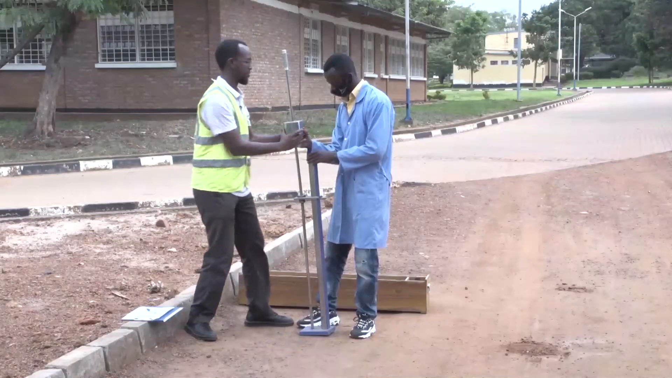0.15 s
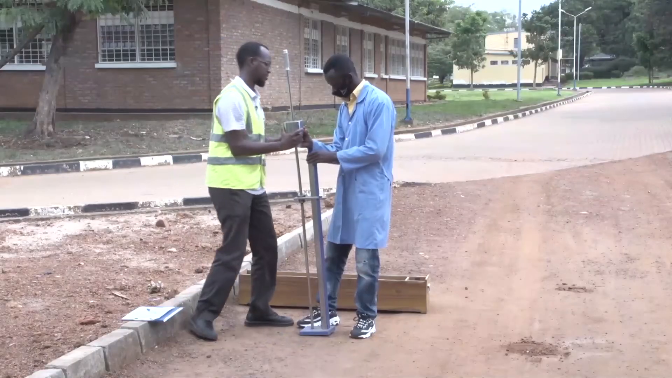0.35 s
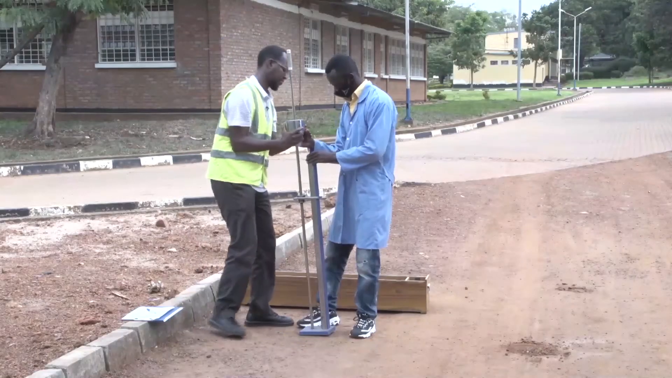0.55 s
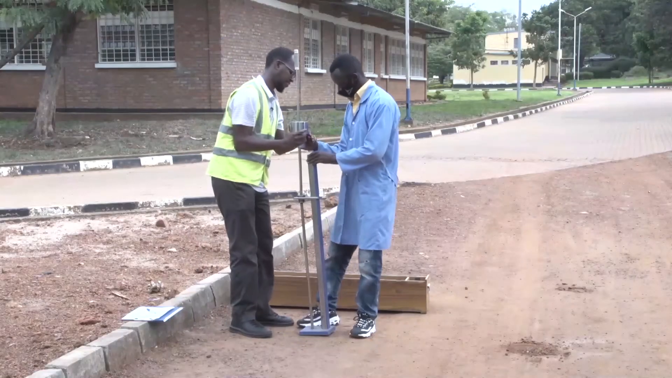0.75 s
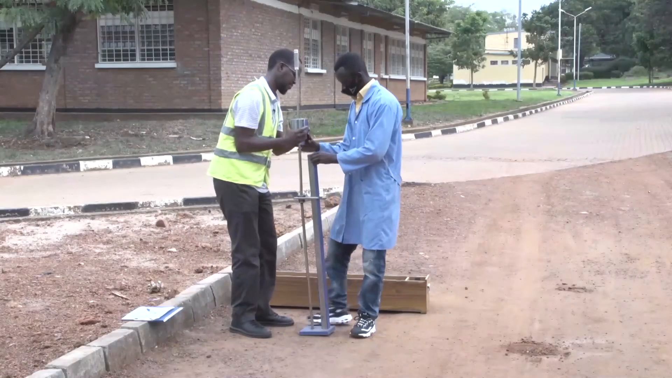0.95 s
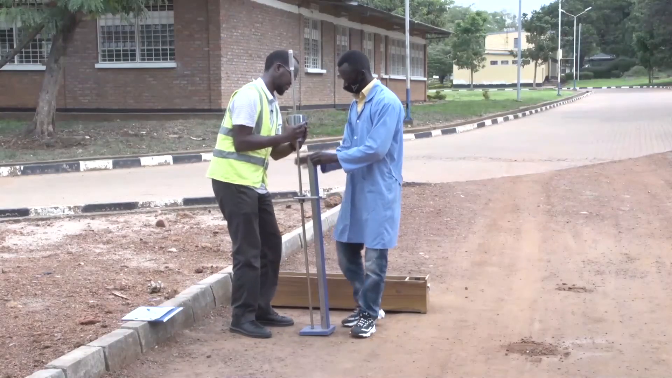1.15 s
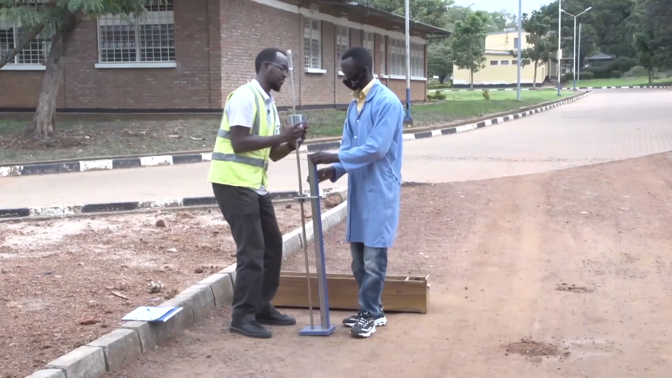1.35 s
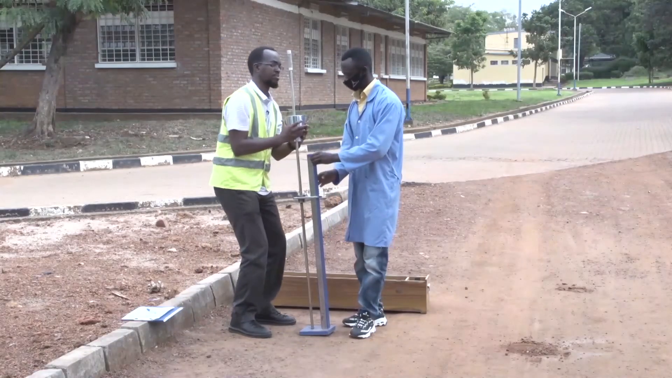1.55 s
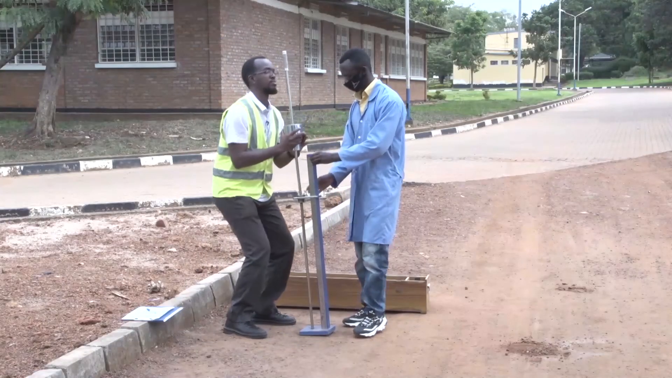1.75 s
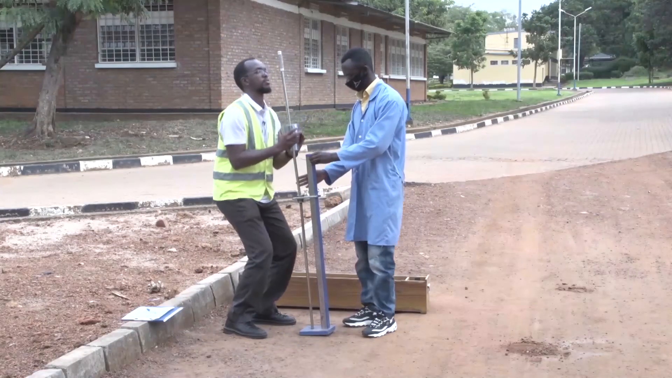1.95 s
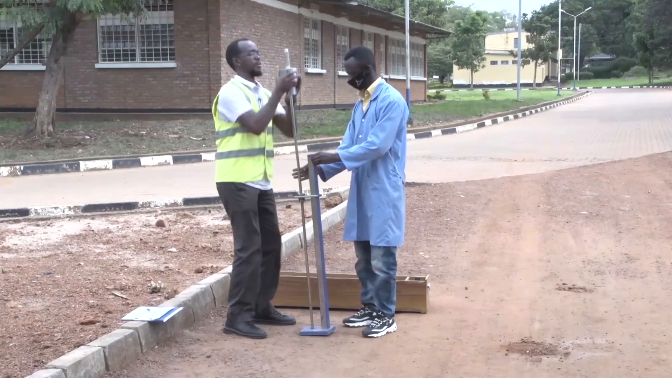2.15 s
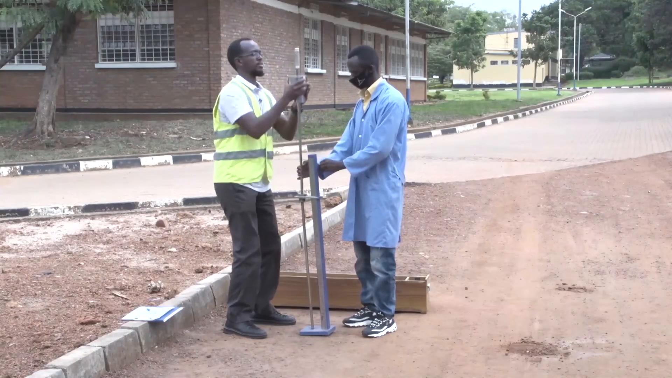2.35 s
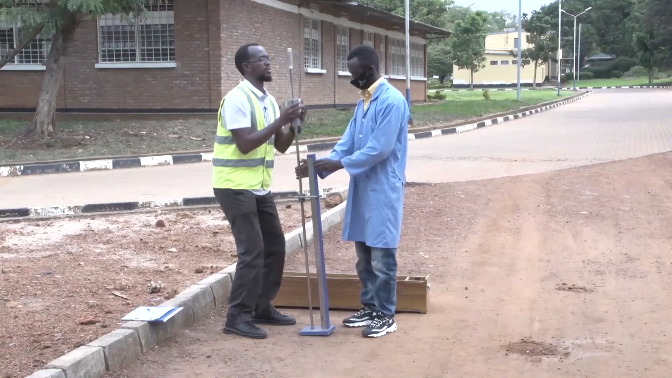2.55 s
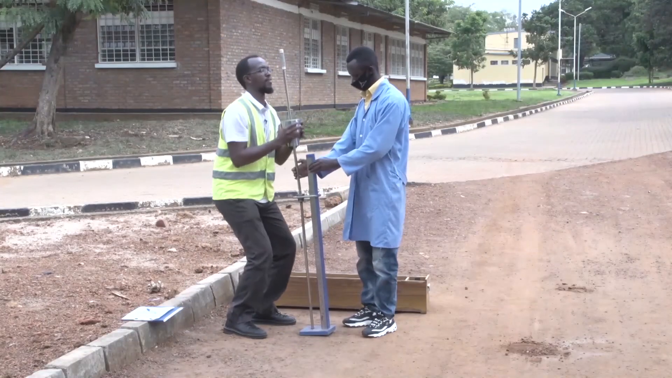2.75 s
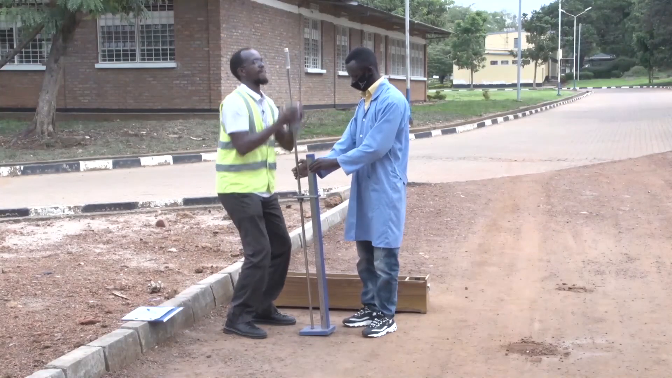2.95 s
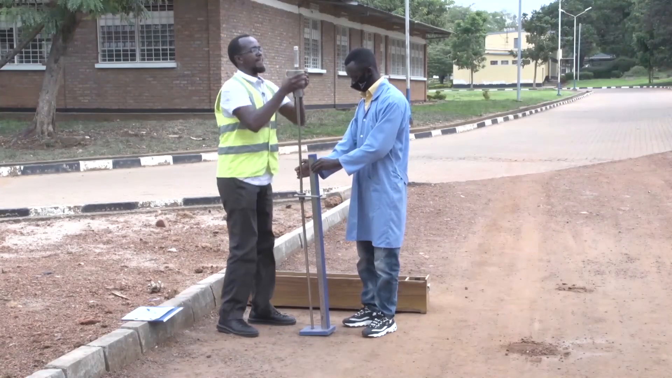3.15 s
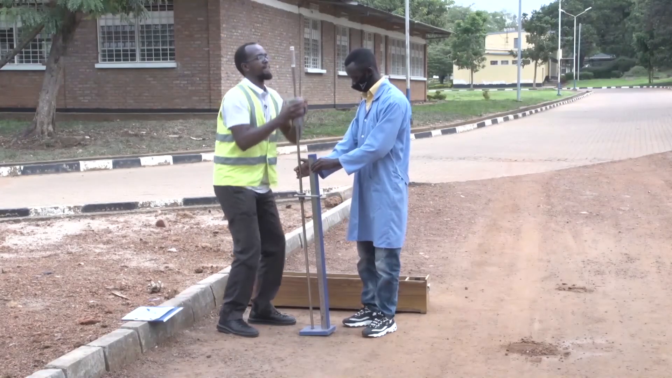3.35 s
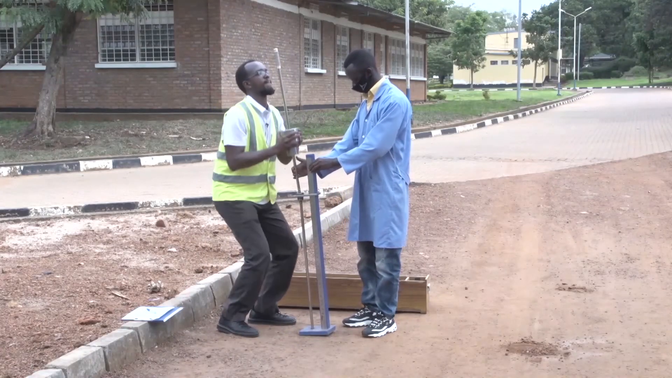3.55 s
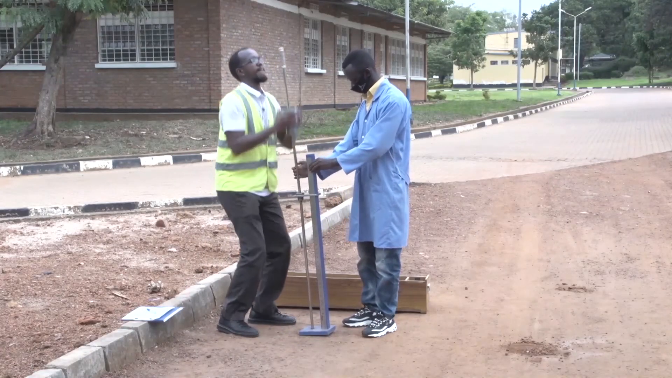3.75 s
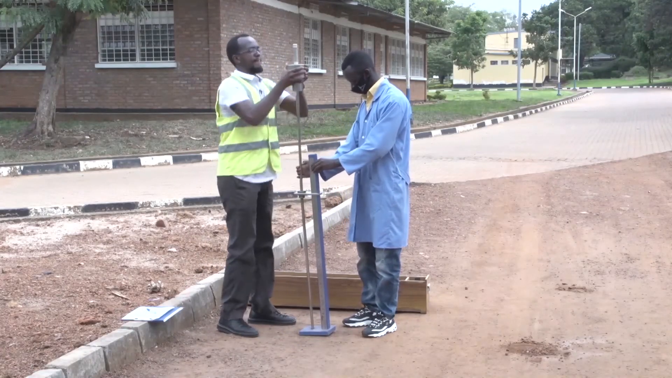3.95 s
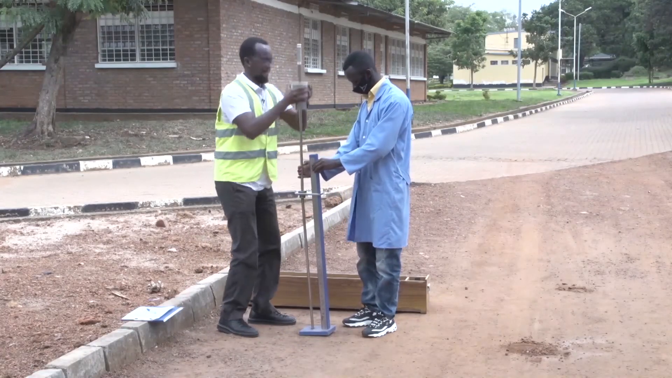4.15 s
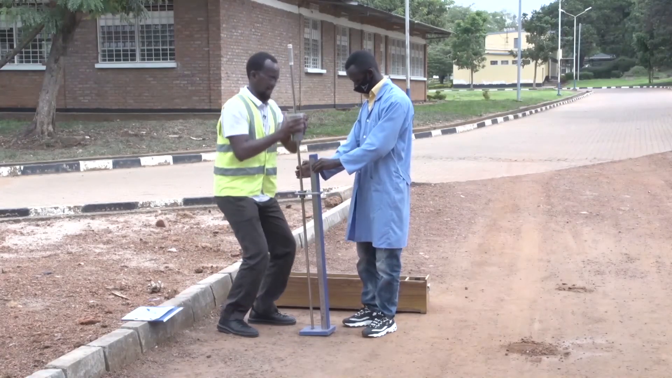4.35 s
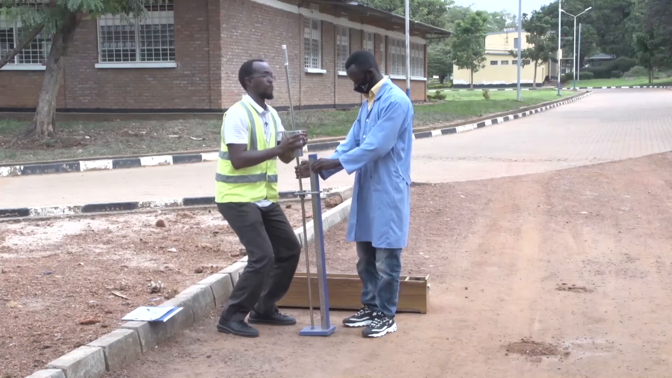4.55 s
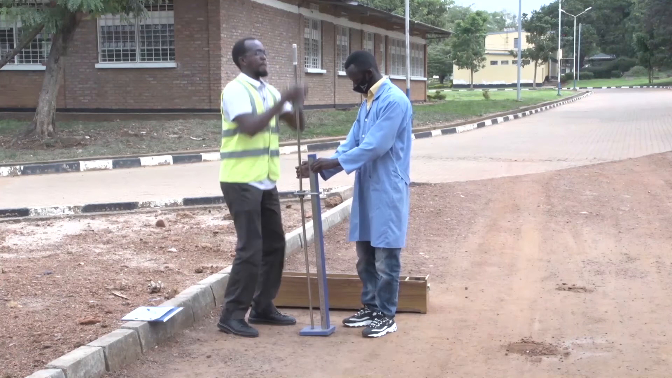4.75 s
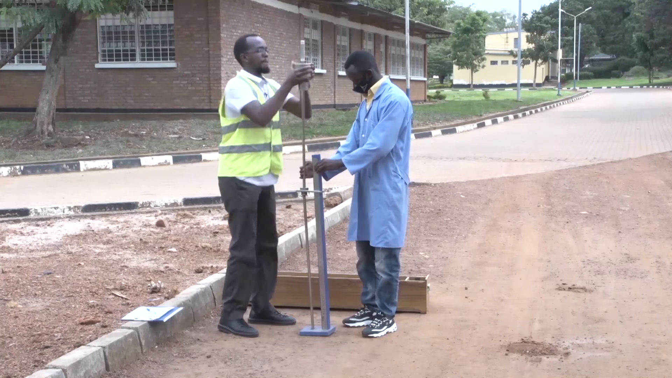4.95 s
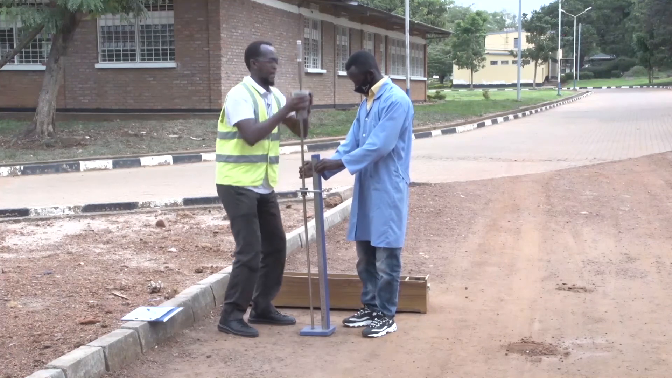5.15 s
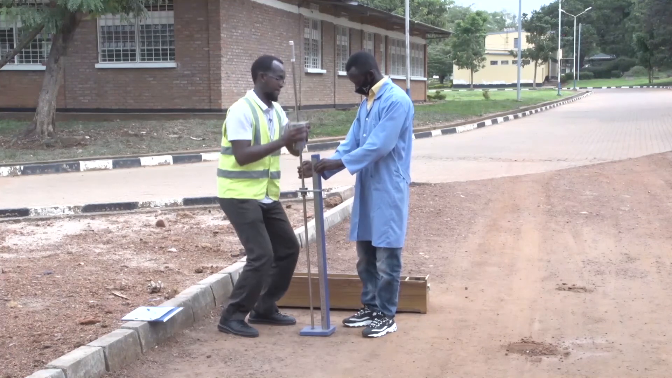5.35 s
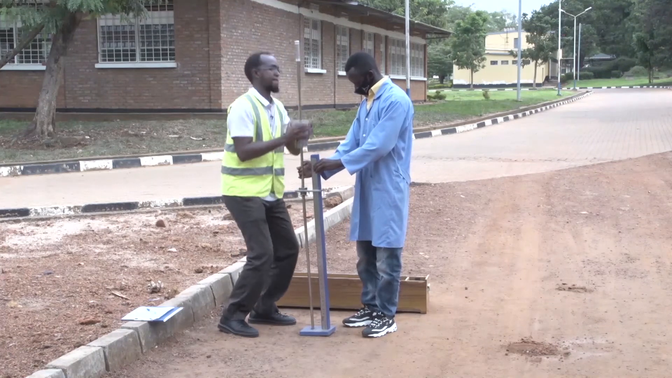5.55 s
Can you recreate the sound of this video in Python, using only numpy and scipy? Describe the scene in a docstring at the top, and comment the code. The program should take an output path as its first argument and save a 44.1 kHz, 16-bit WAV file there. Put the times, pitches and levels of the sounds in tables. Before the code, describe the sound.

A quiet outdoor place with low rumble, faint hiss, a far engine hum that swells and sinks, and a faint even 50-per-second camera buzz. Light metal clinks sound around 1.1 to 1.2 s. From 1.55 s a steel weight is lifted very faintly; a small clink at 1.9 s precedes a quickening, hissing fall from 2.0 s, ending in a hard, bright clank at 2.2 s. Further blows land at 3.1, 3.9 and 4.85 s. Each bites sharply, hops once, rattles and rings briefly, then settles with a dull knock and dies in short outdoor scatter. They overload the microphone and push the background down. Between blows come clinks, especially at 2.3 to 2.7 s, and grainy scraping lifts from 2.46, 3.17 and 4.06 s. A soft wind puff comes near 3.66 s, another at 5.5 s. A fifth lift from 5.0 s binds near its top; the start of a fall ends the scene, nearly centred in stereo.

```python
"""Outdoors, a low rumble with a faint hiss and a far engine hum last throughout; a camera ticks 50 times a second.
After a few clinks, a steel drop hammer is lifted, rubbing on its guide rod: noise through resonances.
It falls with a growing hiss and clanks on the anvil: shaped noise bursts, then a rattle and ringing sine tones.
Four blows follow one another, with clinks, dull knocks and two low puffs of wind made of noise in between.
The blows overload the microphone and push its gain down; a fifth lift and the start of a fall end the scene."""
import sys
import numpy as np
from scipy import signal
from scipy.fft import rfft, irfft
from scipy.io import wavfile
from scipy.ndimage import uniform_filter1d, minimum_filter1d

SR = 44100
rng = np.random.default_rng(int(sys.argv[2]) if len(sys.argv) > 2 else 0)


def wav_record(signal):
    """Record a signal, one row per channel, as 16-bit PCM in the file named by sys.argv[1]."""
    frames = np.transpose(np.atleast_2d(signal))
    bounded = np.clip(frames, -1, 1)
    # unit amplitude maps onto the largest positive 16-bit level
    quanta = np.round(bounded * 32767).astype(np.int16)
    wavfile.write(sys.argv[1], SR, quanta)


N = 247401

# All table levels come before the left-right balance and the gain control.
# Colour of the outdoor air noise. Each row: frequency in Hz, relative level in dB.
AIR_COLOUR = [(20, -16), (50, -0.5), (90, -2), (200, -2.5), (400, 1), (650, -4.5), (1000, -7.5),
              (1500, -12.5), (2500, -17.5), (4000, -20), (8000, -21), (12000, -22), (13000, -21),
              (15500, -22.5)]
# Loudness of the far engine over time. Each row: time in seconds, level in dB before a small common lift.
ENGINE_LEVEL = [(0, -81.5), (1.45, -67), (2.3, -72.5), (2.95, -73.5), (3.5, -68), (4.2, -75.5),
                (4.75, -70.5), (5.5, -80)]
# Soft low puffs of wind. Each row: time of the peak in seconds, level in dB, spread to either side in seconds.
WIND_PUFFS = [(3.662, -61, 0.021), (5.522, -62, .066)]
# Clinks of weight and handle. Each row: start in seconds, colour levels in dB at 550 Hz, 2 kHz and 10 kHz
# (before the small offsets and the resonances in clink), time to fall by 60 dB in seconds.
HANDLE_CLINKS = [(1.0841, -60, -45.5, -52.5, 0.032), (1.102, -64, -52, -63, 0.047),
                 (1.174, -73, -47, -61, .028), (1.924, -57, -56, -83, 0.048),
                 (2.29, -48.5, -50, -72, 0.053), (2.3425, -43, -43, -49, .05),
                 (2.3785, -60, -31, -45.5, .03), (2.392, -63, -40.5, -54.5, 0.073),
                 (2.452, -63, -50, -60, .03), (2.545, -51, -63, -80, 0.068), (2.692, -70.5, -54, -67, .05),
                 (3.273, -51, -47, -49, 0.012), (3.499, -65, -48.5, -57, .012),
                 (4.007, -55.5, -51.5, -60, .1), (4.072, -50, -39, -37, 0.0083),
                 (4.347, -74, -27.5, -63, .012)]
# Resonances of weight and handle. Each row: frequency in Hz, width in Hz, lift in dB.
CLINK_RESONANCES = [(561, 130, 17.7), (1436, 250, 9), (1716, 200, 5.2), (2200, 250, 6.1), (2970, 300, 2.5),
                    (4250, 170, 6.1), (7850, 220, 7.4), (9000, 220, 11)]
# The weight is lifted, held and dropped. Each row: lift start in seconds, lift length in seconds,
# lift rub in dB, lift hiss in dB, extra rub in dB where it binds near the top, drop start in seconds,
# drop rub in dB, drop hiss in dB (both drop levels belong to the full speed at the bottom).
LIFTS_AND_DROPS = [(1.55, .36, -92, -93, 0, 2.025, -60.5, -58.5),
                   (2.46, .36, -70, -74.5, -0.5, 2.91, -56.5, -58.5),
                   (3.17, .40, -70, -71.5, 0.5, 3.725, -57, -55.5),
                   (4.06, .43, -68, -73.5, 4.5, 4.665, -53, -56),
                   (5.0, .42, -66, -69.5, 8.5, 5.55, -60, -72)]
# Low resonances that the rubbing excites. Each row: frequency in Hz, width in Hz, relative level in dB.
RUB_RESONANCES = [(1830, 240, 3), (1980, 480, -1), (2380, 1100, -10)]
# High resonances that the rubbing excites. Each row: frequency in Hz, width in Hz, relative level in dB.
HISS_RESONANCES = [(3150, 1100, 2), (4300, 800, 2), (4900, 620, 0), (6440, 1700, -7.5), (7800, 900, -5.5),
                   (9000, 470, -1), (10100, 350, -6.5), (12000, 3000, -16.5)]
# Hammer on anvil. Each row: start in seconds, clash level in dB, chatter length in seconds, time for the clash
# to fall by 60 dB in seconds, rod ring in dB, ring tilt in dB per octave, rattle level in dB, time for the
# rattle to fall by 60 dB in seconds, rebound level in dB, settling knock in dB (set as a clink's 550 Hz level).
HAMMER_BLOWS = [(2.1959, -6.0, 0.0046, .031, -8, -1, -37.5, .2, -32, -58),
                (3.0924, -3.5, .0013, .03, -.5, .7, -31, .11, -15.5, -39),
                (3.8943, -5, .003, .033, 3, 1.6, -23, .11, -20, -61),
                (4.8398, -0.3, .0012, .013, 3.5, 1.5, -22, .11, -12.5, -37.5)]
# Smooth spectrum of steel clashing on steel. Each row: frequency in Hz, relative level in dB.
CLASH_COLOUR = [(20, -18.5), (45, -4), (120, -3), (280, -4), (420, -3.5), (780, -4), (1000, -5), (1600, -3),
                (3000, -2.5), (4400, -6), (6200, -4.5), (10000, -6), (11000, -6.5), (15500, -11)]
# Broad resonances of hammer and anvil; each blow favours other ones.
# Each row: frequency in Hz, width in Hz, then the lift in dB in each of the four blows.
CLASH_RESONANCES = [(255, 210, 7, 4, -1.5, 3.5), (774, 130, 6, 9, 9, 5), (980, 70, -1.5, -5.5, 8.5, 1),
                    (1184, 110, 9, 2, 0.5, 5), (1587, 170, 9.5, 11, 6, 12), (1900, 220, -3.5, 9, 13, 9.5),
                    (2100, 170, 11, 4, -5, -4), (2350, 200, 4.5, -0.5, -7.5, 0.5),
                    (2786, 380, 7.5, 2.5, 11, 9.5), (3100, 240, -7.5, -13.5, -0.5, 6),
                    (3408, 410, 6, 0.5, 9.5, 8.5), (3970, 220, 1, 1.5, 5, 9.5),
                    (5200, 460, 12.5, 13, 19, 11), (5600, 160, -0.5, 7, 1, 10.5),
                    (6470, 300, 5.5, 9, 8.5, 4), (7530, 200, 1, 10.5, 2, -2),
                    (8700, 130, 11, 9.5, 7.5, 8.5), (9150, 180, 5, 1, 7, 0),
                    (9750, 230, 18.5, 14.5, 11, 7.5), (11690, 330, 6, 5, 4.5, -5),
                    (13340, 220, 0.5, 1.5, 9, 0.5)]
# Lasting modes of the rod. Each row: frequency in Hz, level in dB before each blow's ring level and tilt,
# time to fall by 60 dB in seconds before the weight chokes it.
ROD_MODES = [(541, -35.5, .2), (570, -40.5, 0.34), (1112, -42.5, 0.18), (1713, -38, .16),
             (2972, -35.5, 0.083), (3510, -36, .07), (4080, -47, .15), (4352, -45, 0.16),
             (4670, -41.5, 0.11), (5000, -58, 0.51), (5300, -45.5, 0.15), (6200, -35.5, 0.14),
             (7060, -46.5, .13), (9000, -45, 0.14), (8872, -42, .09), (9830, -35, .08), (13310, -50, .13),
             (14470, -44, 0.13)]
# Change of colour by scatter from ground and buildings. Each row: frequency in Hz, relative level in dB.
SCATTER_COLOUR = [(100, -6.5), (500, -8), (1000, -1), (1900, -2), (5000, 1), (10000, -2), (15000, -7)]

LENGTH = 32768   # samples in one contact sound
T = np.arange(N) / SR   # time in the scene, s
AGE = np.arange(LENGTH) / SR   # time since a contact, s


def from_db(db):
    """Decibels to gain."""
    return 10 ** (np.asarray(db) / 20)


def rms_one(x):
    """Scale to an rms (average strength) of one."""
    return x / np.sqrt(np.mean(x ** 2) + 1e-20)


def fade(age, t60):
    """Full until age zero, then dies away by 60 dB in t60 seconds."""
    return np.exp(-np.log(1000) * np.maximum(age, 0) / t60)


def add(out, s, sound):
    """Mix a sound in at time s."""
    i = round(s * SR)
    out[i:i + len(sound)] += sound[:N - i]


def shape_db(points, peaks=(), size=LENGTH):
    """A smooth spectrum with resonance humps on it, in dB on the FFT grid."""
    hz = np.maximum(np.fft.rfftfreq(size, 1 / SR), 1)
    knots, levels = np.transpose(points)
    humps = sum(lift / (1 + (2 * (hz - centre) / width) ** 2) for centre, width, lift in peaks)
    return np.interp(np.log(hz), np.log(knots), levels) + humps


def colour(x, curve_db):
    """Minimum-phase filter of unit power gain: nothing sounds before its cause."""
    log_gain = np.log(rms_one(from_db(curve_db)))
    cepstrum = irfft(log_gain, len(x))
    # folding the second half onto the first turns the gain curve into a filter that only looks back
    cepstrum[1:len(x) // 2] *= 2
    cepstrum[len(x) // 2 + 1:] = 0
    response = np.exp(rfft(cepstrum))
    return irfft(rfft(x) * response, len(x))


def resonate(x, hz, width_hz):
    """A resonance with gain one on top."""
    r = np.exp(-np.pi * width_hz / SR)
    top = np.array([1, 0, -1]) * (1 - r * r) / 2
    bottom = [1, -2 * r * np.cos(2 * np.pi * hz / SR), r * r]
    return signal.lfilter(top, bottom, x + 1e-18)


def drift(rate):
    """Smooth random wandering with an rms of one; rate is in random points per second."""
    knots = rng.standard_normal(4096)
    return rms_one(np.interp(T * rate, np.arange(len(knots)), knots))


def chatter(envelope, order=12):
    """A burst of countless tiny contacts under an envelope, its energy spread evenly over pitch."""
    envelope = envelope[:LENGTH // 8]
    burst = rng.standard_normal(len(envelope)) * envelope
    # in turns, flatten the spectrum and restore the envelope
    for _ in range(order):
        even = irfft(np.exp(1j * np.angle(rfft(burst))))
        strength = np.sqrt(np.abs(uniform_filter1d(even ** 2, size=32)) + 1e-14)
        burst = even * envelope / strength
    return np.pad(burst, (0, LENGTH - len(burst)))


def air(level_db=-65.3, flutter_db=0.2):
    """Distant outdoor rumble over a faint hiss: coloured noise with a slight flutter in level."""
    gain = from_db(shape_db(AIR_COLOUR, size=N))
    noise = irfft(rfft(rng.standard_normal(N)) * gain, N)
    return from_db(level_db + flutter_db * drift(24)) * rms_one(noise)


def engine(firing_hz=128, waver_hz=.4, lift_db=0.5, octave_db=-10):
    """A far engine: the firing note and its octave, wavering slightly in pitch."""
    phase = 2 * np.pi * np.cumsum(firing_hz + waver_hz * drift(3)) / SR
    hum = np.sin(phase) + from_db(octave_db) * np.sin(2 * phase)
    level_db = np.interp(T, *np.transpose(ENGINE_LEVEL)) + lift_db
    return from_db(level_db) * rms_one(hum)


def camera_tick(ticks_per_s=50, hz=520, width_hz=440, level_db=-69.6):
    """The camera's mechanism ticks for each picture: resonant clicks, dulled into a faint, even buzz."""
    clicks = np.zeros(N)
    at = np.round(np.arange(.0096, T[-1], 1 / ticks_per_s) * SR).astype(int)
    clicks[at] = from_db(.6 * rng.standard_normal(len(at)))   # slightly uneven, in dB
    treble_cut = signal.butter(2, 1000, fs=SR, output="sos")
    dull = signal.sosfilt(treble_cut, resonate(clicks, hz, width_hz))
    return from_db(level_db) * rms_one(dull)


def wind(hz=85, width_hz=70):
    """Brief low puffs on the microphone: noise through two low resonances, swelling and sinking."""
    strength = sum(from_db(db) * np.exp(-((T - s) / spread) ** 2 / 2) for s, db, spread in WIND_PUFFS)
    narrow = resonate(rng.standard_normal(N), hz, width_hz)
    return strength * rms_one(resonate(narrow, hz, 2 * width_hz))


def clink(low_db, mid_db, high_db, t60, touch_s=.0008, grain_db=3.0):
    """A light contact: a short, grainy burst through the resonances of weight and handle."""
    points = [(200, low_db - 16), (550, low_db - 1), (900, (low_db + mid_db) / 2 - 3.5),
              (2000, mid_db - 5), (10000, high_db - 2.5), (15000, high_db - 11)]   # Hz, dB
    curve = shape_db(points, CLINK_RESONANCES)
    strength = np.sqrt(np.mean(from_db(curve) ** 2))   # colour() alone would lose the level
    grain = from_db(grain_db * drift(500)[:LENGTH])
    touch = np.minimum(AGE / touch_s, 1) * fade(AGE, t60) * grain
    return 2 * strength * colour(chatter(touch), curve)


def clinks(settle_s=.051, settle_mid_db=-9, settle_top_db=-18, settle_t60_s=.06):
    """The weight clinks as it is handled, and comes to rest with a dull knock after each blow."""
    out = np.zeros(N)
    for s, *contact in HANDLE_CLINKS:
        add(out, s, clink(*contact))
    for s, *_, db in HAMMER_BLOWS:
        # the knock's middle and top are set against its level at 550 Hz
        knock = clink(db, db + settle_mid_db, db + settle_top_db, settle_t60_s)
        add(out, s + settle_s, knock)
    return out


def progress(start, length):
    """Share of a movement that is done, from zero to one."""
    return np.clip((T - start) / length, 0, 1)


def friction(modes, grain_db, patchy_db):
    """Grainy rubbing; the contact wanders and favours one resonance after another."""
    grains = rng.standard_normal(N) * from_db(grain_db * drift(700))
    out = np.zeros(N)
    for k, (hz, width, db) in enumerate(modes):
        sign = (-1) ** k   # every other resonance is flipped
        out += sign * resonate(grains, hz, width) * from_db(db + patchy_db * drift(55))
    return rms_one(out)


def along_rod(x, height, echo, low_hz=520, high_hz=1050):
    """An echo in the free rod above the weight: its colour rises with the lift and falls with the drop."""
    lag = SR / (low_hz + (high_hz - low_hz) * height)   # samples
    i = np.arange(N)
    return rms_one(x + echo * np.interp(i - lag, i, x))


def slide(drop_s=.172, lift_edge_s=0.057, bind_at=0.8, bind_width=.14):
    """The weight rubs evenly up the rod and may bind near the top; its fall gets louder with speed."""
    rub, hiss, height = np.zeros((3, N))
    for start, length, rub_db, hiss_db, bind_db, drop, drop_rub_db, drop_hiss_db in LIFTS_AND_DROPS:
        up, down = progress(start, length), progress(drop, drop_s)
        height += (1 - np.cos(np.pi * up)) / 2 - down ** 2
        # the lift gets going and stops gently
        lifting = np.minimum(np.minimum(up, 1 - up) * length / lift_edge_s, 1)
        # bind_at and bind_width are shares of the lift
        binding = np.exp(-((up - bind_at) / bind_width) ** 2 / 2)
        # in free fall the speed grows evenly with time, and the rubbing with it
        falling = down * (down < 1)
        rub += lifting * from_db(rub_db + bind_db * binding) + falling * from_db(drop_rub_db)
        hiss += lifting * from_db(hiss_db) + falling * from_db(drop_hiss_db)
    low_rub = friction(RUB_RESONANCES, grain_db=1.8, patchy_db=3.0)
    high_hiss = friction(HISS_RESONANCES, grain_db=3.6, patchy_db=3.0)
    return rub * along_rod(low_rub, height, echo=0.26) + hiss * along_rod(high_hiss, height, echo=0.68)


def rod_ring(level_db, tilt_db, shake=0.43, shake_hz=90, middle_hz=2000, settle_s=0.056, choke_t60=0.037):
    """The rod's modes ring on; the loose weight shakes their level, then settles and chokes them."""
    out = np.zeros(LENGTH)
    lowest_hz = ROD_MODES[0][0]
    for hz, mode_db, t60 in ROD_MODES:
        knots = rng.standard_normal(256)
        waver = 1 + shake * np.interp(AGE * shake_hz, np.arange(len(knots)), knots)
        strength = from_db(level_db + mode_db + tilt_db * np.log2(hz / middle_hz))
        # the wide swings of the low modes are stopped first
        choked = fade(AGE - settle_s, choke_t60 * (hz / lowest_hz) ** 2)
        out += strength * waver * fade(AGE, t60) * choked * np.sin(2 * np.pi * hz * AGE)
    return out


def blow_rattle(rattle_db, rattle_t60, steel, smooth, scatter_db=-47, scatter_t60=.42,
                ground_db=-20, ground_t60=0.075, steel_share=0.23, grain_db=1.0):
    """The loose parts rattle unevenly, merging with quick ground scatter and slower building scatter."""
    loose = from_db(rattle_db + grain_db * drift(500)[:LENGTH]) * fade(AGE, rattle_t60)
    buildings = from_db(scatter_db) * fade(AGE, scatter_t60)
    ground = from_db(ground_db) * fade(AGE, ground_t60)
    tail = np.hypot(loose + buildings, ground)
    # the steel's resonances are only partly heard here
    curve = smooth + steel_share * (steel - smooth) + shape_db(SCATTER_COLOUR)
    return tail * rng.standard_normal(LENGTH), curve


def blows(bite_s=.0012, thud_db=-52, thud_hz=32, thud_t60=.16, rebound_s=.008, rebound_t60_s=.017):
    """The weight chatters on the anvil for milliseconds, hops once and lands again; the rod rings on."""
    out = np.zeros(N)
    bite = np.minimum(AGE / bite_s, 1)   # quick onset
    smooth = shape_db(CLASH_COLOUR)
    for k, blow in enumerate(HAMMER_BLOWS):
        s, db, hold, t60, ring_db, tilt_db, rattle_db, rattle_t60, rebound_db, _ = blow
        peaks = [(hz, width, lifts[k]) for hz, width, *lifts in CLASH_RESONANCES]
        steel = shape_db(CLASH_COLOUR, peaks)
        clash = colour(from_db(db) * chatter(bite * fade(AGE - hold, t60)), steel)
        noise, curve = blow_rattle(rattle_db, rattle_t60, steel, smooth)
        rattle = colour(bite * noise, curve)
        ring = bite * rod_ring(ring_db, tilt_db)
        thud = from_db(thud_db) * fade(AGE, thud_t60) * np.sin(2 * np.pi * thud_hz * AGE)
        add(out, s, clash + rattle + ring + thud)
        landing = from_db(rebound_db) * chatter(bite * fade(AGE, rebound_t60_s))
        add(out, s + rebound_s, colour(landing, steel))
    return out


def scene(left_db=0.76, side_db=-19, hammer_left_db=0.33):
    """The blows are almost straight ahead; all other sounds lean a little more to the left."""
    sides = np.array([[1], [-1]])   # left, right
    wide_air = from_db(side_db) * air() * sides   # opposite in the two channels
    background = air() + wide_air + engine() + camera_tick() + wind()
    others = background + clinks() + slide()
    return blows() * from_db(hammer_left_db * sides) + others * from_db(left_db * sides)


def gain_control(x, threshold_db=-22.6, boost_db=10, start_cut_db=7.5, recover_db_per_s=3.0,
                 hold_s=.5, sense_s=.02, ahead_s=.004):
    """Loud sound pushes the gain down and holds it for a while; in quiet it creeps up again."""
    r = np.exp(-1 / (sense_s * SR))
    power = signal.lfilter([1 - r], [1, -r], np.mean(x ** 2, axis=0))
    over = 10 * np.log10(power + 1e-14) - threshold_db
    # the highest excess in the last hold_s seconds
    half = int(hold_s * SR / 2)
    held = -minimum_filter1d(-over, 2 * half + 1, origin=half, mode="nearest")
    # from each peak on, the cut shrinks at a steady rate
    recovered = recover_db_per_s * T
    cut = np.maximum.accumulate(np.maximum(held + recovered, start_cut_db)) - recovered
    # the gain acts slightly ahead of the sensed level
    return x * from_db(boost_db - np.interp(T + ahead_s, T, np.maximum(cut, 0)))


def record(dry, cutoff_hz=15800):
    """The gain control rides the level, yet the blows overload the input; the top is cut."""
    loud = gain_control(dry)
    clipped = loud / (1 + loud ** 6) ** (1 / 6)   # rounds off peaks near full level
    top_cut = signal.ellip(10, .1, 80, cutoff_hz, fs=SR, output="sos")
    return signal.sosfilt(top_cut, clipped)


dry = scene()
out = record(dry)
wav_record(out)
```